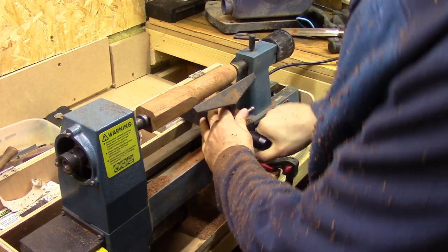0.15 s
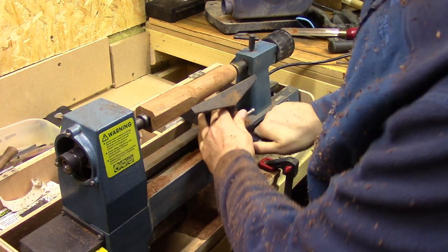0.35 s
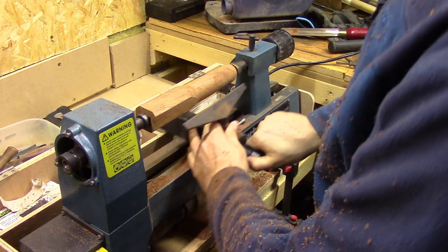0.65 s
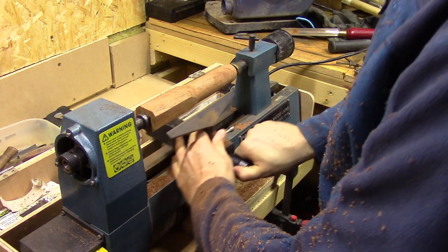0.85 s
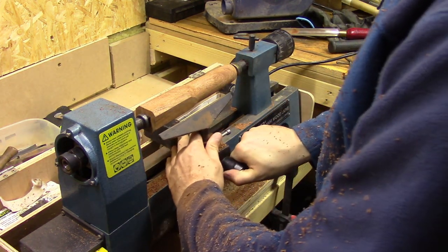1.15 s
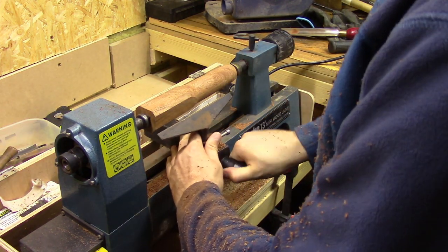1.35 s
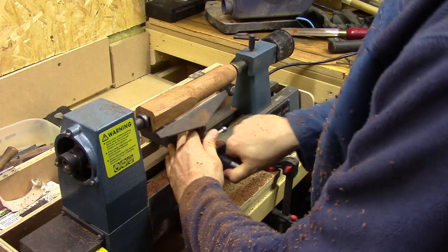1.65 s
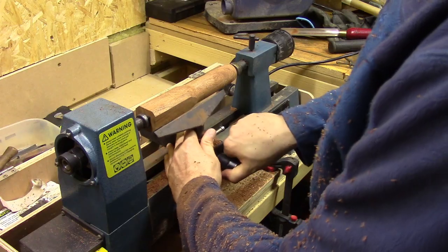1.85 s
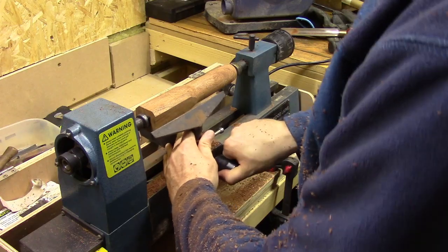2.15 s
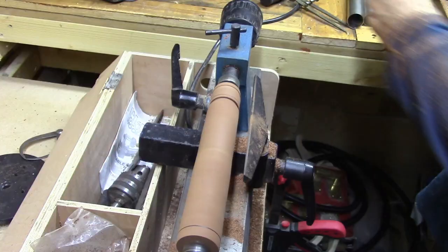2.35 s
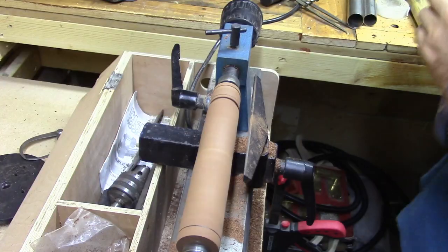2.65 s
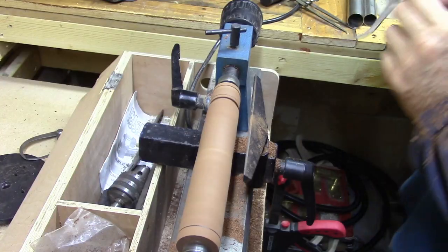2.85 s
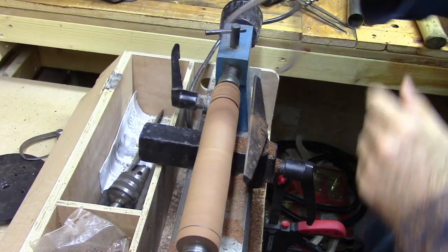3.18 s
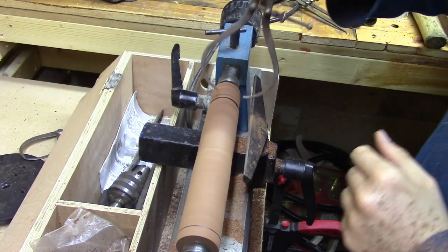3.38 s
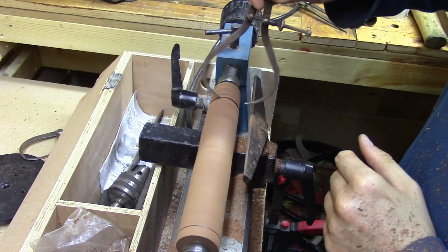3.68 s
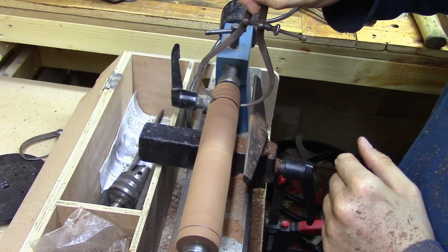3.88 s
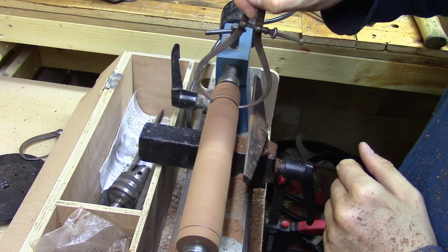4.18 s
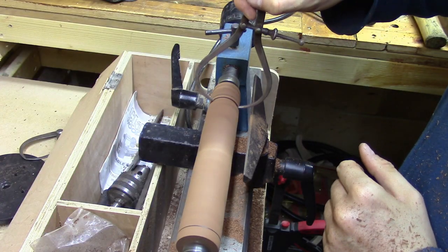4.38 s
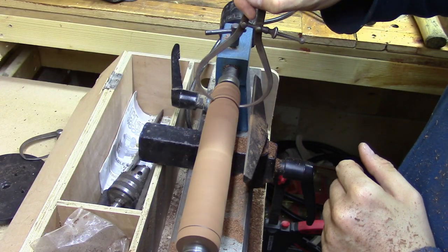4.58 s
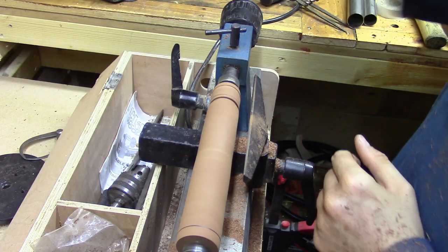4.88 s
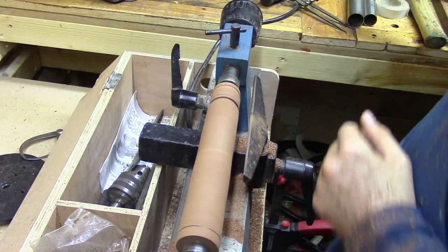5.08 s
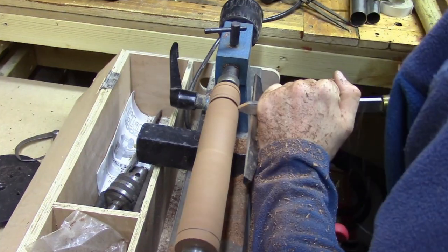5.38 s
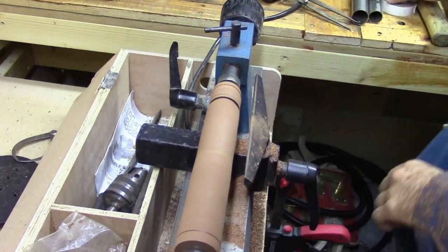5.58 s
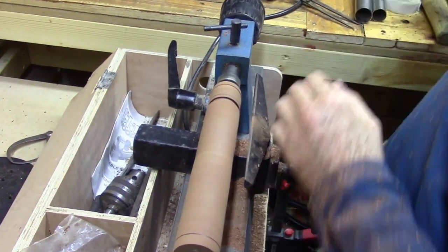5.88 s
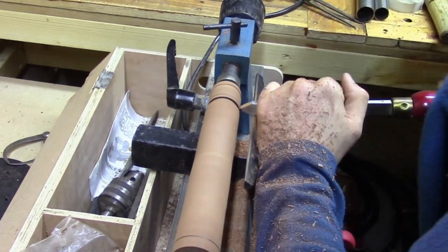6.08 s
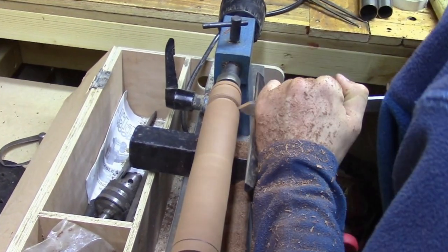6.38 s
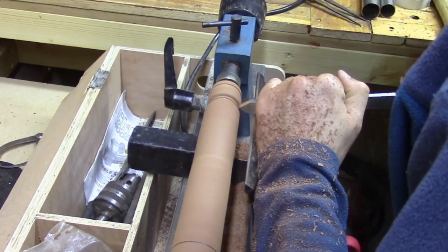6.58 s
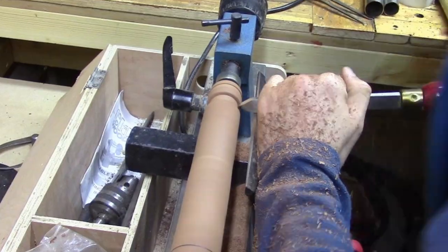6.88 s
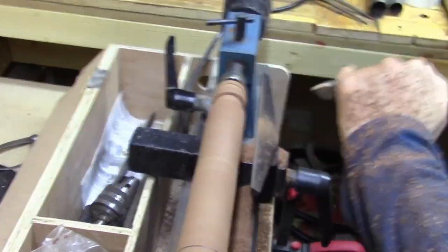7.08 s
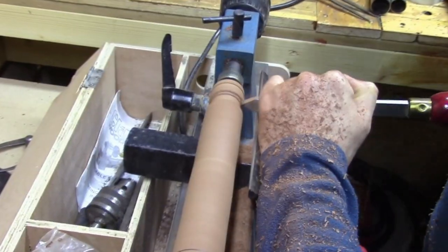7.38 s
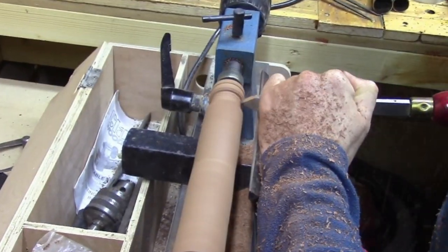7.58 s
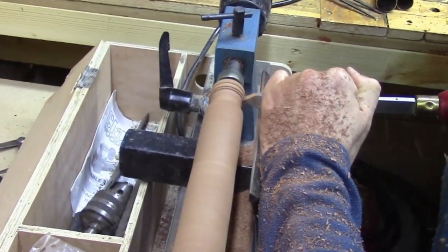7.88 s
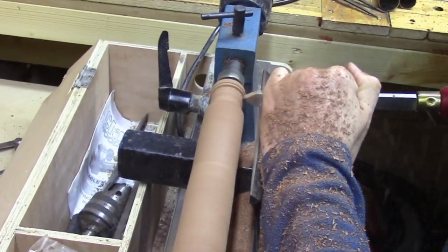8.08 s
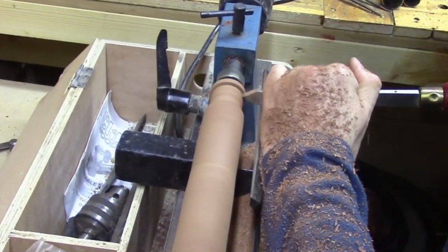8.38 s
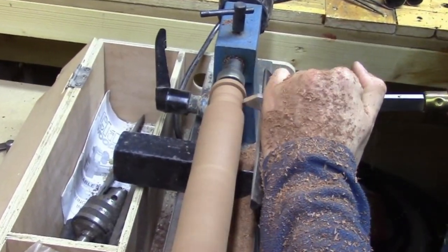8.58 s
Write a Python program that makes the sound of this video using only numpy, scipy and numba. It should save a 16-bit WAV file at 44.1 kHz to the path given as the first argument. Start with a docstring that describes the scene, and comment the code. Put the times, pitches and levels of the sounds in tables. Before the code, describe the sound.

Faint gritty metal sliding and bumps, then a loud steady lathe motor whirr with light knocks, then high sped-up scraping squeals in rapid bursts.

```python
"""Small wood lathe, plywood workshop

Three shots. The tool rest slides along the bed of the stopped lathe: gritty noise and bumps ring the iron.
The motor idles, hum and shaft tones over a fluttering roar, while calipers touch the blank: short dying tones.
In a time-lapse, ten times faster and higher, a parting tool scrapes (resonant noise) and chatters (spindle
orders near two modes); the spindle slows under each cut. Walls widen the sound and the camera's gain ducks.
"""
import sys
import numpy as np
from scipy import signal
from scipy.fft import rfft, irfft, next_fast_len
from scipy.io import wavfile
from scipy.ndimage import uniform_filter1d, map_coordinates
from numba import njit

SR = 44100
rng = np.random.default_rng(int(sys.argv[2]) if len(sys.argv) > 2 else 0)


def store_wav(level_fs):
    """Save 16-bit WAV to argv[1]."""
    pcm = np.round(np.clip(np.atleast_2d(level_fs), -1, 1) * 32767)
    wavfile.write(sys.argv[1], SR, pcm.T.astype(np.int16))


N = 385434  # samples

FAST = 10  # speed of the time-lapse
TURN_HZ = 62.2  # spindle turns a second when idling, before the time-lapse speed


def amp(db):
    """Gain of a level in dB."""
    return 10 ** (np.asarray(db) / 20)


def unit(x):
    """Scaled to rms 1."""
    return x / np.sqrt(np.mean(x ** 2) + 1e-20)


def along(points, hz):
    """Value at hz between (f/Hz, value) points on a log axis."""
    f, value = np.transpose(points)
    return np.interp(np.log(hz + 1), np.log(f + 1), value)


def wobble(rate):
    """A smooth random curve, rate knots a second."""
    knots = rng.standard_normal(int(N * rate / SR) + 4)
    return map_coordinates(knots, [np.arange(N) * rate / SR])


def filtered(x, response):
    """x times a complex response of frequency."""
    m = next_fast_len(N + 8192)
    return irfft(rfft(x, m) * response(np.fft.rfftfreq(m, 1 / SR)), m)[..., :N]


def noise(spectrum):
    """Coloured noise of rms 1; only the shape of the spectrum counts."""
    return unit(filtered(rng.standard_normal(N), lambda hz: amp(along(spectrum, hz))))


def modes(table):
    """Response of a set of resonances, summed with alternating sign."""
    def response(f):
        total = 0
        for k, (centre, width, db) in enumerate(table):
            resonance = 1j * f * width / (centre * centre - f * f + 1j * f * width)
            total = total + (-1) ** k * amp(db) * resonance
        return total
    return response


def lag(x, seconds):
    """First-order inertia."""
    keep = np.exp(-1 / (seconds * SR))
    return signal.lfilter([1 - keep], [1, -keep], x)


def tones(table, speed, flicker_db, drift, pace):
    """Tones follow the given speed; each flickers in level and pitch."""
    out = np.zeros(N)
    for hz, db in table:
        turns = np.cumsum(hz * speed * (1 + drift * wobble(pace))) / SR
        heard = hz * speed < SR / 2
        level = amp(db + flicker_db * wobble(pace)) * np.sqrt(2)
        out += heard * level * np.sin(2 * np.pi * (turns + rng.random()))
    return out


def strike(out, s, db, hz, t60, crack):
    """One blow: a dying tone with a faster-dying burst of noise."""
    t = np.arange(SR // 8) / SR
    blow = np.sin(2 * np.pi * hz * t) + crack * rng.standard_normal(len(t)) * amp(-60 * t / 0.022)
    onset = 1 - np.exp(-1000 * t)
    out[round(s * SR):][:len(t)] += amp(db - 60 * t / t60) * onset * blow


LOWER_HZ, UPPER_HZ = 3980, 4600  # the two chatter modes
LOCK_HZ = 230  # how far a mode pulls a spindle order
OTHER_DB = -12.5  # mode weights: lower 0.5 of this leading, 1.5 not; upper 0 leading, all of it not
MEMORY_S, PATCHY_DB = 0.0062, 2.4  # persistence of the marks; flicker of each order
SWELL = .8  # how much chatter swells as an order meets the mode
DIP, HOP_S = .85, .008  # dip while changing mode (share), lag of the change
EVEN_DB = -10.5  # above this one order takes over
# Overtones of each chatter order: multiple, level/dB
OVERTONES = [(1, 5.5), (2, -11.5), (3, -15)]


def chatter(turn_hz, bite, lower):
    """Marks around the blank sound at whole orders of the spindle; the order nearest the leading mode wins."""
    orders = np.arange(6, 13)[:, None]

    def pull(hz):
        return 1 / (1 + ((orders * turn_hz - hz) / LOCK_HZ) ** 2) ** 1.34

    near = amp(OTHER_DB * (1.5 - lower)) * pull(LOWER_HZ) + amp(OTHER_DB * lower) * pull(UPPER_HZ)
    flicker = np.array([wobble(70)[:len(bite)] for _ in orders])
    near = lag(near, MEMORY_S) * amp(PATCHY_DB * flicker)
    hopping = lag(lower, HOP_S)
    swell = np.sum(near ** 2, axis=0) ** (SWELL / 2)
    bite = bite * swell * (1 - np.clip(DIP, 0, 1) * 4 * hopping * (1 - hopping))
    # the harder the bite, the more the nearest order outweighs the rest
    share = near ** np.maximum(1, bite / amp(EVEN_DB)) ** 0.96 + 1e-9
    share = share / np.sqrt(np.sum(share ** 2, axis=0))
    turns = orders * np.cumsum(turn_hz) / SR + rng.random((len(orders), 1))
    wave = sum(amp(db) * share ** k * np.sin(2 * np.pi * k * turns) for k, db in OVERTONES)
    return np.sqrt(2) * bite * wave.sum(axis=0)


EASE_PER_S = 1.0  # share of pressure let off per second once at depth
DEEP_DRAG = .2  # share of speed lost under a full cut
# Chatter: first level at most, cap over the final level; start before full depth, rise, stop
FIRST_DB, HEADROOM_DB, LEAD_S, RISE_S, FADE_S = -6.5, 2.5, 0.031, 0.016, 0.0043
# Pushes of the parting tool: touch t/s, sinking t/ms, holding t/ms, slowest turn f/Hz (idle speed scale,
# before the drive's lag), lower mode after the touch t/ms (none if not positive), final chatter level/dB
# (before swell and flicker)
CUTS = [(5.162, 38, 280, 53.2, 0, -35), (5.162, 78, 13.6, 48.4, 0, -11.5),
        (5.238, 72, 9.4, 45.47, -2, -5.5), (5.31, 59, 8.8, 45.53, -1.5, -7), (5.383, 49, 7.6, 48, 28, -7.5),
        (5.434, 53, 13.7, 48.8, -2, -14), (6.17, 88, 9.2, 47.06, 0, -11.5),
        (6.3, 64.6, 59.4, 50.56, 99, -4.5), (6.431, 8, 9.7, 60.6, -3, -10), (6.458, 45, 13, 50, 0, -14.5),
        (6.551, 43.2, 91.4, 49.34, 3, 7), (6.74, 26.4, 67, 48.8, 3, -1.5),
        (6.864, 43.3, 49.4, 48.57, 54, 2.5), (7.366, 45.7, 85, 49.64, 65, -6),
        (7.546, 32.4, 94.4, 48.97, 6, 1), (7.701, 47.5, 30.6, 49.1, 80, -5),
        (7.8, 38.4, 47, 50.96, 92, -8.5), (7.914, 39.7, 53, 48.97, 73.5, 1), (8.034, 54, 67, 48.7, 46, -1),
        (8.203, 48, 33.3, 48.9, 66.5, 2.5), (8.33, 43.6, 36, 50.9, 50, -11),
        (8.421, 40, 7.4, 50.14, 10, -13), (8.56, 10.2, 12, 55.8, 28, -8), (8.596, 8.9, 6.9, 54.3, 18, -7),
        (8.622, 15.8, 6, 54.3, 0, -9.5), (8.648, 11, 5, 54.2, 1, -11), (8.67, 6, 12, 54.5, 1.5, -11)]


def plunges():
    """Depth, drag on the spindle, chatter size and chatter mode under every push."""
    depth, drag, bite, lower = np.zeros((4, N))
    for touch, sink_ms, hold_ms, slowest_hz, lower_ms, db in CUTS:
        full = touch + sink_ms / 1000
        lift = touch + (sink_ms + hold_ms) / 1000
        a, b = round(touch * SR), round((lift + FADE_S) * SR)
        t = np.arange(a, b) / SR
        sunk = np.clip((t - touch) / max(full - touch, .003), 0, 1) * (t < lift)
        pull = (1 - slowest_hz / TURN_HZ) * sunk * (1 - EASE_PER_S * np.maximum(t - full, 0))
        sings = max(touch, full - LEAD_S)
        gate = np.clip(np.minimum((t - sings) / RISE_S, (lift + FADE_S - t) / FADE_S), 0, 1)
        first_db = min(db + HEADROOM_DB, FIRST_DB)
        size = gate * amp(np.interp(t, [sings, max(lift, sings)], [first_db, db]))
        # overlapping pushes: the stronger counts
        depth[a:b] = np.maximum(depth[a:b], np.minimum(1, pull / DEEP_DRAG))
        drag[a:b] = np.maximum(drag[a:b], pull)
        bite[a:b] = np.maximum(bite[a:b], size)
        lower[a:a + max(0, round(lower_ms * SR / 1000))] = 1
    return depth, drag, bite, lower


# Resonances of blank and tool: f/Hz, width/Hz, level/dB
SCRAPE = [(3770, 430, 4), (4180, 230, 3), (5430, 400, -1), (8900, 2400, -5.5), (11040, 210, 3.5),
          (11880, 490, -1.5), (12760, 830, 5)]


def scraping(speed):
    """The edge meets the same grain on every turn: a pulse a turn, among fresh fibres, through resonances."""
    turn = np.floor(np.cumsum(TURN_HZ * speed) / SR)
    pulses = np.diff(turn, prepend=0) * amp(2 * wobble(150))
    grain = unit(pulses) + .9 * rng.standard_normal(N)
    return unit(filtered(grain, modes(SCRAPE))) * amp(1.5 * wobble(150))


# Low hum (60 Hz) and belt and shaft orders at idling speed, also played by idling(): f/Hz, level/dB
TONES = [(60, -54.5), (129, -43), (258, -39.5), (312, -34), (349, -36.5), (653, -30.5), (669, -31),
         (892, -32.5), (979.5, -20), (1115, -23.5), (1244, -28), (1301, -30.5), (1338, -29.5), (1632, -31),
         (2304, -30.5), (2550, -27.5), (2574, -29), (2875, -32.5)]
# A hum that keeps its pitch under load, also played by idling(): f/Hz, level/dB
STEADY = [(446, -24.5)]
# Spectrum of the drive noise in the time-lapse: f/Hz, relative level/dB per Hz
FIZZ = [(18, -50), (30, -19), (3820, -11), (4470, -9), (5230, -14.5), (9540, -13), (15700, -7)]


def loaded_drive(sag):
    """Motor tones fall in pitch and level as the spindle sags; the steady hum keeps its pitch, the noise its level."""
    motor = tones(TONES, FAST * (1 - sag), 0.96, 0.000824, pace=90)
    motor = motor + tones(STEADY, FAST, 1.8, 0.0023, pace=90)
    return amp(0.5 - 78 * sag) * motor + amp(-16.5 + wobble(30)) * noise(FIZZ)


def time_lapse():
    """Each cut slows the drive, scrapes the blank and sets the tool chattering."""
    depth, drag, bite, lower = plunges()
    sag = lag(drag, 0.009)  # s, inertia of the drive
    speed = FAST * (1 - sag)
    drive = loaded_drive(sag)
    first = round(SHOTS[1] * SR)
    squeal = np.pad(chatter(TURN_HZ * speed[first:], bite[first:], lower[first:]), (first, 0))
    squeal = squeal * amp(2.2 * wobble(300))
    scrape_gain = amp(-9.5) * lag(bite, 0.003) + amp(-9.5) * lag(depth ** 1.14, 0.01)
    return drive + squeal + scrape_gain * scraping(speed)


IDLE_TOP_HZ = 14800  # upper band limit of the idling shot
# Brush whine: f/Hz, level/dB
WHINE = [(4482, -40), (6723, -31), (11205, -45)]
# Spectrum of the idling noise: f/Hz, relative level/dB per Hz
ROAR = [(18, -70), (30, -56.5), (316, -8.5), (388, -13), (442, -5), (668, -21), (780, -21.5), (985, -7.5),
        (1490, -13), (2560, -7.5), (3680, -18.5), (6850, -20.5), (14500, -40)]
# Resonances of the motor housing: f/Hz, width/Hz, level/dB
HOUSING = [(2200, 20, -35), (3970, 13, 7), (4650, 46, 10.5), (7720, 41, 6.5), (12600, 260, 17.5)]
# The caliper catches the blank: t/s, starting level/dB of the tone
CALIPER = [(4.279, -7.5), (4.418, -11), (4.588, -6.5)]


def idling():
    """Steady hum and orders over the roar of belt and bearings, which flutters; calipers knock the blank."""
    roar = filtered(noise(ROAR), lambda hz: 1 + np.abs(modes(HOUSING)(hz))) * amp(wobble(60))
    whine = tones(WHINE, 1, 1, .0005, pace=40)
    hum_and_orders = tones(TONES + STEADY, 1, 1.6, .0012, pace=14)
    out = hum_and_orders + whine + amp(-17.5) * roar
    for s, db in CALIPER:
        strike(out, s, db, 383, t60=0.13, crack=0.81)
    return filtered(out, lambda hz: hz < IDLE_TOP_HZ)


def strokes(rows):
    """Soft-edged gain of every stroke."""
    gain = np.zeros(N)
    for start, end, db in rows:
        gain[round(start * SR):round(end * SR)] = amp(db)
    return uniform_filter1d(gain, round(0.051 * SR))


RING_DB, CRUMBS_DB = -14, -12.5  # high bed modes and rustling shavings, relative to the rumble of a stroke
# Strokes of the tool rest: start t/s, end t/s, rumble level/dB (before soft edges)
SLIDE = [(0.043, 0.09, -39), (0.384, .47, -43), (0.462, 0.8, -34.5), (0.81, 0.969, -35),
         (1.101, 1.178, -45), (1.61, 1.798, -44), (1.97, 2.06, -49), (2.203, 2.28, -53)]
# Resonances of the iron bed: f/Hz, width/Hz, level/dB
BED = [(269, 67, -5), (459, 35, 3), (661, 86, -1.5), (1110, 480, -10), (2796, 69, -12), (4330, 28, -13.5),
       (7140, 32, -14), (8300, 130, -26)]
# The rest bumps the bed: t/s, peak level/dB (before the roll-off)
KNOCKS = [(0.073, -22.5), (0.186, -38), (0.395, -19.5), (.53, -22), (.84, -43), (0.911, -23), (1.614, -35),
          (2.101, -34.5), (2.236, -31.5)]
# Small metal ticks: t/s, starting level/dB of the tone
TICKS = [(0.04, -33), (1.0071, -49), (1.9849, -45.5)]
# Cloth rustles: start t/s, end t/s, level/dB (before soft edges)
SLEEVE = [(1.287, 1.32, -51), (1.393, 1.582, -48.5)]
# Spectrum of the workshop's background noise: f/Hz, relative level/dB per Hz
SHOP = [(53, -40), (90, 1.5), (473, 2), (1580, -7), (12000, -23), (15600, -59), (22000, -120)]


def tool_rest():
    """Sliding grit and bumps excite the iron bed; cloth and shavings rustle; ticks stand out of the room noise."""
    grit = amp(1.5 * wobble(41.65)) * rng.standard_normal(N)
    low = modes([m for m in BED if m[0] < 2000])
    high = modes([m for m in BED if m[0] > 2000])
    crumbs = noise([(300, -7.0), (6000, -12.5), (12000, -25)]) * amp(1.8 * wobble(90))
    slide = strokes(SLIDE)
    out = slide * (unit(filtered(grit, low)) + amp(RING_DB) * unit(filtered(grit, high)))
    out += (amp(CRUMBS_DB) * slide + strokes(SLEEVE)) * unit(crumbs)

    bumps = np.zeros(N)
    for s, db in KNOCKS:
        bumps[round(s * SR)] = amp(db)

    def thud(hz):
        return low(hz) / (1 + 1j * hz / 420) ** 2

    out += filtered(bumps, thud) / np.abs(filtered(np.arange(N) == 0, thud)).max()
    for s, db in TICKS:
        strike(out, s, db, 2400, t60=0.042, crack=3.0)

    def roll_off(hz):
        return 1 / (1 + (hz / 11000) ** 4) / (1 + (80 / (hz + 1)) ** 2)

    return filtered(out, roll_off) + amp(-56) * noise(SHOP)


# Left-right likeness that sets the wall sound, before it wavers: f/Hz, likeness 0-1
ALIKE = [(30, .92), (130, .9), (300, .992), (4000, .987), (16000, .955)]


def wall_sound(mid):
    """Walls return a short dying echo, opposite in left and right, whose level and sign waver at random."""
    n = SR // 4
    walls = rng.standard_normal(n) * amp(-60 * np.arange(n) / SR / .2)
    echo = signal.fftconvolve(mid, walls / np.linalg.norm(walls))[:N]

    def share(hz):
        return np.tan(np.arccos(np.clip(along(ALIKE, hz), 0, 1)) / 2)

    return filtered(echo, share) * wobble(33)


# Cuts between the shots: t/s of the idling shot, t/s of the time-lapse
SHOTS = (2.36, 5.192)


def scene():
    """Three shots cut together; walls add a weak part that differs between left and right."""
    shot = np.searchsorted(SHOTS, np.arange(N) / SR)
    mid = np.choose(shot, [tool_rest(), idling(), time_lapse()])
    side = wall_sound(mid)
    return np.array([mid + side, mid - side])


@njit
def ducking(level_db, ceiling_db, attack, release):
    """Gain falls fast towards the ceiling and climbs back at a steady rate."""
    gain_db, now = np.zeros(len(level_db)), 0.0
    for i in range(len(level_db)):
        want = min(0.0, ceiling_db - level_db[i])
        if want < now:
            now = now + attack * (want - now)
        else:
            now = min(want, now + release)
        gain_db[i] = now
    return gain_db


TOP_HZ = 15850  # overall band limit


def record(dry):
    """The camera's automatic gain control, soft clipping and band limit."""
    power = np.abs(uniform_filter1d(np.mean(dry ** 2, axis=0), size=300))
    level_db = 10 * np.log10(power + 1e-12)
    gain_db = ducking(level_db, -9.5, 1 / (0.0013 * SR), 230 / SR)  # 1.3 ms attack, 230 dB/s release
    wet = dry * amp(gain_db)
    wet = wet / (1 + np.abs(wet) ** 6) ** (1 / 6)
    return filtered(wet, lambda hz: np.clip((TOP_HZ - hz) / 200, 0, 1) ** 2)


dry = scene()
out = record(dry)
store_wav(out)
```